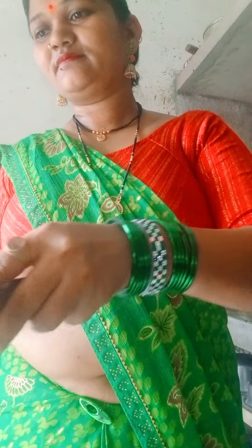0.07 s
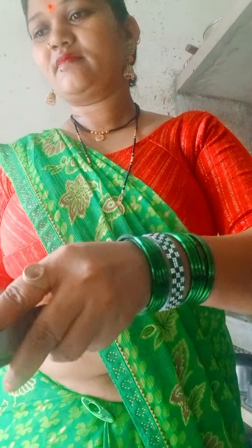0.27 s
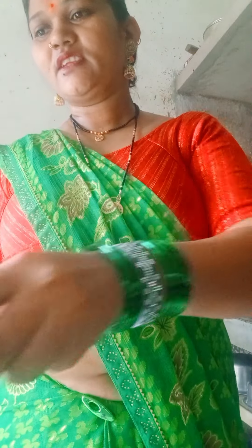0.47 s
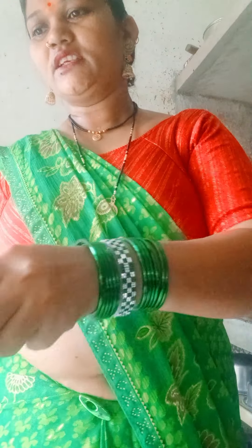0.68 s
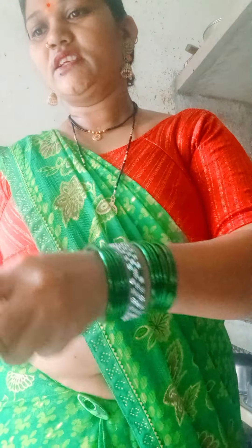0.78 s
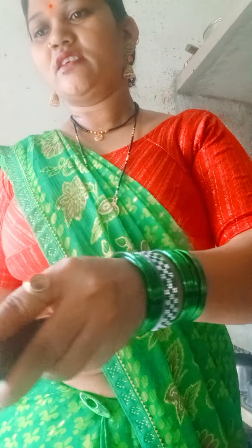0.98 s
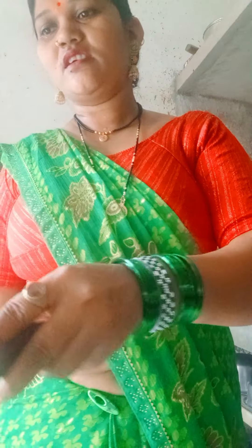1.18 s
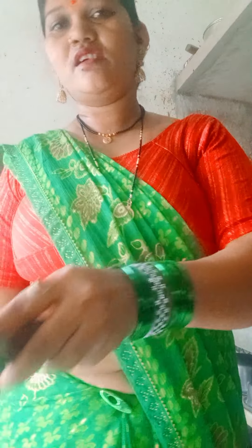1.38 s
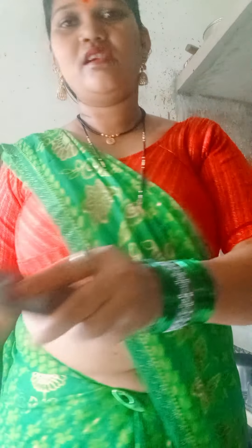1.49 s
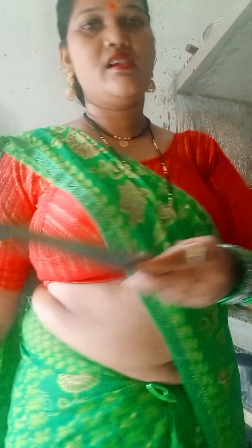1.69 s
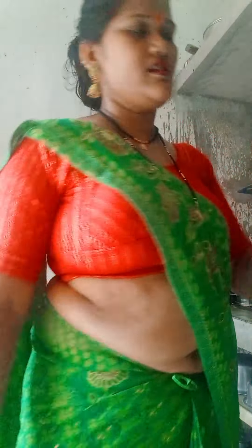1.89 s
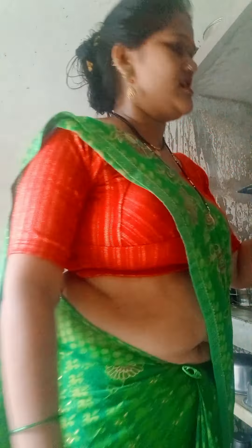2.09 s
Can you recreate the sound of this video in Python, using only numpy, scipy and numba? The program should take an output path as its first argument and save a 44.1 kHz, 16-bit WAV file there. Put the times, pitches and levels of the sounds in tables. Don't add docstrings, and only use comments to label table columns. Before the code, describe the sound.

Stacked glass bangles rattle and knock loudly on a shaken wrist close to a small microphone, stop at about one and a half seconds, then a few loose ones tinkle in a small hard kitchen.

```python
import sys
import numpy as np
from scipy import signal
from scipy.fft import rfft, irfft
from scipy.io import wavfile
from scipy.ndimage import uniform_filter1d, minimum_filter1d
from numba import njit

SR = 44100
rng = np.random.default_rng(int(sys.argv[2]) if len(sys.argv) > 2 else 0)


def persist_wave(psi):
    counts = np.round(np.clip(psi, -1, 1) * 32767).astype(np.int16)
    wavfile.write(sys.argv[1], SR, np.atleast_2d(counts).T)


def makeup_ratio(level_db):
    decades = np.asarray(level_db, float) / 20
    return 10 ** decades


N = 94770

# start_s [s], level_db [dB], bright [dB per octave], bass [dB per octave]
SHAKING = [(0, -21, 10, 6), (0.121, -18, -4.5, -3.5), (0.217, -22, -12, -18), (0.241, -19, 7.5, 5.5),
           (0.369, -16.5, 6.5, 0.5), (0.468, -21, 1, 4), (0.562, -36, -1, -10.5), (0.634, -15, 5, -8.5),
           (.71, -29, 7.5, -23), (0.854, -31.5, 0.5, -5), (0.892, -18, 5, -13), (0.997, -19.5, 4, -5.5),
           (1.081, -35.5, -12.5, -17.5), (1.14, -42.5, -9, -12), (1.161, -23, 8.5, 4),
           (1.29, -23, -1.5, -11), (1.4, -22, 3.5, 6.5), (1.53, -35, -25.5, -30)]
# start_s [s], peak_db [dB], bright [dB per octave], chatter_db [dB]
HARD_KNOCKS = [(0.034, 2, -6, -11), (0.054, -17, -4, -14.5), (0.082, -23, 13, -1), (0.101, 4.5, -10, -1.5),
               (0.141, 0.5, -8, -1), (0.2, -14, -6, -12), (0.229, -12, -10, -7.5), (0.271, -2, 5, -19),
               (0.306, -10, 14, -16.5), (0.358, 4.5, -12, 4), (0.397, 8, 5, -10.5), (0.455, 8.5, 2, -12),
               (0.494, 10.5, 3, -10.5), (0.558, -8, -10.5, -13), (0.588, 4, 4, 2.5),
               (0.645, 7.5, -12.5, -1), (0.729, -2.5, 7.5, 0.5), (0.78, 5.5, 2, -3), (0.872, 1, 7, 0),
               (0.912, -4, 12.5, -16), (0.963, -23, 1, 0), (1.025, -6, -26, 3), (1.152, -7.5, 2.5, 5),
               (1.183, 13.5, -5.5, -5), (1.214, 2.5, 6.5, -7), (1.236, 2, 5, -9), (1.301, 5, 2.5, -18.5),
               (1.32, 11, 3.5, -15.5), (1.387, 6, 5, -18), (1.492, -7.5, -10, 2.5)]
# start_s [s], peak_db [dB], pitch_hz [Hz]
SHARP_BLOWS = [(0.0134, -5.5, 1960), (0.0333, -5.5, 1750), (0.0538, -4.5, 2140), (0.0749, -9.5, 1720),
               (0.0827, -12, 1770), (0.0931, -16.5, 1940), (0.1019, -9.5, 1980), (0.1414, -7, 1670),
               (0.1646, -12.5, 1740), (0.171, -13, 2100), (0.2011, -10, 1840), (0.21, -17.5, 2100),
               (0.2284, -9, 1760), (0.2369, -10.5, 2020), (0.2718, -3, 1800), (0.3053, 4, 2200),
               (0.3119, -23, 2060), (0.3197, -12, 2340), (0.3371, -7, 1980), (0.3446, -9.5, 1860),
               (0.3659, -1.5, 1910), (0.3721, 4, 1554), (0.3969, -2, 2075), (0.4022, -5.5, 1880),
               (0.417, -5, 1860), (0.427, -2, 1585), (0.4383, -10.5, 1910), (0.4551, -15.5, 1620),
               (0.477, -8, 2090), (0.4936, -4.5, 1910), (0.5005, -6, 1338), (0.5584, -16.5, 2020),
               (0.583, -12, 2170), (0.5882, -11.5, 2190), (0.6389, -9, 1644), (0.6469, -4.5, 1920),
               (0.7296, -12.5, 2350), (0.7803, -2, 1780), (0.7968, -7, 2025), (0.8666, -21, 1990),
               (0.8717, -7, 2430), (0.913, -3.5, 2800), (0.9642, -10.5, 1900), (0.9772, -7.5, 2120),
               (0.988, -17.5, 1690), (1.0234, -13.5, 1900), (1.1783, -9, 2060), (1.1849, -1.5, 1950),
               (1.217, -5, 2200), (1.2353, -3.5, 1746), (1.2505, -10, 2060), (1.2786, -16.5, 1900),
               (1.2953, -14, 1590), (1.302, -8.5, 2110), (1.32, -4.5, 2160), (1.3432, -3.5, 1700),
               (1.3741, -8, 1960), (1.3901, -3.5, 2080), (1.3967, -6.5, 1780), (1.4915, -22, 1870)]
BODY_MODES_HZ = [703, 875, 871.4, 1205, 1239.5, 1474, 1675, 1853, 1995, 2215, 2513, 2696, 2990, 3534]
# pitch_hz [Hz], density_db [dB per Hz]
FIZZ_SPECTRUM = [(3000, -34), (4500, 0), (8500, -9.5), (12500, -31), (15500, -11.5)]
# pitch_hz [Hz], density_db [dB per Hz]
STACK_SPECTRUM = [(430, -41.5), (700, -15), (900, -2), (1900, 8), (2900, -7), (4500, -28), (8500, -47.5),
                  (16000, -59.5)]
# start_s [s], peak_db [dB]
LOOSE_TOUCHES = [
    (1.9463, -32.5),
    (1.9714, -25.5),
    (1.9967, -23.5),
    (2.0203, -17),
]
# pitch_hz [Hz], level_db [dB], t60_s [s]
FIRST_BANGLE = [(5660, 3.5, 0.035), (8400, -12, 0.018), (10300, 11, 0.033), (10700, 0, 0.028),
                (14700, -7, .04), (15600, 14, 0.041)]
SECOND_BANGLE = [(5400, -12, 5.0), (6640, -8, 0.034), (7140, -6, 5.0), (8500, -2, 0.03), (9060, -24, 5.0),
                 (9900, -8, 0.071), (10980, -8, 0.19), (15600, -4.5, 0.12), (15710, -29, 5.0)]
THIRD_BANGLE = [(3750, -13, 0.16), (4400, -25, 5.0), (5560, -5, 0.072), (6480, -4, 0.024), (8630, -9, 0.08),
                (10900, -17, 0.093), (10800, -13, 0.22), (15020, -17, 5.0), (16100, -24, 5.0)]
LAST_BANGLE = [(3720, -16, 0.24), (5580, -16.5, 0.21), (5500, -10.5, 0.17), (6090, -6, 0.049),
               (7250, -14, 0.13), (8500, -26, 0.097), (9970, -10.5, .25), (10320, 1, 0.44),
               (11300, -9, 0.18), (14800, -1, .14), (15700, -5, 0.12)]
# start_s [s], peak_db [dB]
FAINT_TOUCHES = [
    (1.5716, -62),
    (1.641, -46),
    (1.675, -45.5),
    (1.701, -55),
    (1.932, -51),
]
# pitch_hz [Hz], level_db [dB], t60_s [s]
FAINT_BANGLE = [(6750, -11, 0.016), (7050, -21, 0.055), (8430, 3, 0.027), (10800, -3, 0.033),
                (10370, 6, 0.031), (14600, -22, 0.027), (15900, 6, 0.036)]
# pitch_hz [Hz], density_db [dB per Hz]
CRACK_SPECTRUM = [(1760, -69), (3000, -41), (3620, -34), (4130, -12), (5250, -14.5), (10300, 3),
                  (12400, -5.5), (16000, 9), (17000, -53)]
# start_s [s], pitch_hz [Hz], level_db [dB], t60_s [s]
SINGING_RINGS = [
    (1.061, 4500, -62, .1),
    (1.071, 3134, -50, 0.12),
    (1.166, 1260, -26, 0.049),
    (1.52, 3493, -74, 0.66),
    (1.7, 3470, -62.5, 0.38),
    (1.819, 5750, -69.5, 0.18),
    (1.83, 4260, -68, 0.33),
    (1.891, 5660, -44, 0.11),
]
# centre_s [s], level_db [dB], length_s [s]
AIR_PUFFS = [
    (0.354, -72, 0.034),
    (1.3, -66, .06),
    (1.55, -61, 0.042),
]
# pitch_hz [Hz], density_db [dB per Hz]
HUSH_SPECTRUM = [(30, -33), (130, -9), (450, -12), (1500, 2.5), (2200, -5.5), (3500, -24), (7000, -38.5),
                 (16500, -49.5)]
# pitch_hz [Hz], gain_db [dB]
MIC_RESPONSE = [(9000, 5.5), (11000, -4.5), (12600, -6.5), (14200, -8.5), (15800, 5.5), (16100, -22)]

CONTACT_CYCLES = 0.88
PIVOT_HZ = 1800


def curve(table, hz):
    f, db = np.array(table, float).T
    return np.interp(np.log(np.maximum(hz, 1)), np.log(f), db)


def colour(x, table):
    y = irfft(rfft(x) * makeup_ratio(curve(table, np.fft.rfftfreq(len(x), 1 / SR))), len(x))
    return y / y.std()


def highpass(x, hz, order):
    return signal.sosfilt(signal.butter(order, hz, "highpass", fs=SR, output="sos"), x)


@njit
def rings(start, hz, t60, rise, size, count, sr):
    out = np.zeros(count)
    for k in range(len(hz)):
        turn = np.exp(2j * np.pi * hz[k] / sr - np.log(1000) / (t60[k] * sr))
        z = size[k] + 0j
        first = int(start[k] * sr)
        unrisen = 1.
        fall = np.exp(-1 / (rise[k] * sr))
        for i in range(max(first, 0), min(count, first + int(t60[k] * sr))):
            out[i] += z.imag * (1 - unrisen) ** 3
            z *= turn
            unrisen *= fall
    return out


def strike(s, hz, t60, size, rise=0.):
    s, hz, t60, size, rise = (np.ravel(1. * a) for a in np.broadcast_arrays(s, hz, t60, size, rise))
    rise = rise + CONTACT_CYCLES / hz
    return rings(s, np.clip(hz, 50, .45 * SR), np.clip(t60, .001, .6), rise, size, N, 1. * SR)


def contact(s, db, bright, bass):
    thud_cycles, ring_t60_s, ring_db = 7.0, .04, -9
    glint_t60_s, glint_db = 0.039, -6.5
    s, db, bright, bass = (a[:, None] for a in (s, db, bright, bass))
    u = rng.random((len(s), 48))

    def tilt(hz):
        slope = np.where(hz > PIVOT_HZ, bright, -bass)
        return curve(STACK_SPECTRUM, hz) + np.log2(hz / PIVOT_HZ) * slope

    hz = 420 * 2 ** (.44 * (np.arange(12) + u[:, :12]))
    late = .0006 * u[:, 24:36] * (1 + 5 * (hz > 3500))
    spread = np.maximum(hz / PIVOT_HZ, PIVOT_HZ / hz) ** 1.22
    thud_t60 = thud_cycles * (.5 + u[:, 12:24]) / PIVOT_HZ * spread
    thud_db = db + tilt(hz) - 9.9 * (hz > 5000) + 6.0 * np.log10(hz / PIVOT_HZ) - 1.7 * u[:, 36:]
    sign = np.sign(u[:, 36:] - .5)
    thud = strike(s + late, hz, thud_t60, sign * makeup_ratio(thud_db))

    pick = (len(BODY_MODES_HZ) * u[:, 20:23]).astype(int)
    body = np.array(BODY_MODES_HZ)[pick] * (.97 + 0.061 * u[:, 6:9])
    ring_t60 = ring_t60_s * (.5 + u[:, 3:6]) * np.maximum(1500 / body, 1)
    ring = strike(s, body, ring_t60, makeup_ratio(db + ring_db + tilt(body)))

    high = 3600 * 2 ** (0.23 * (np.arange(12) + u[:, 26:38]))
    size = makeup_ratio(db + glint_db + tilt(high) + 10 * u[:, :12] ** 14)
    glint = strike(s + .01 * u[:, 36:], high, glint_t60_s * (0.11 + u[:, 13:25]), size, 0.00017)
    return thud + ring + glint


def rattle():
    bounces_per_s, spread_db, bounce_db = 440, 3.5, -7
    t, db, bright, bass = np.array(SHAKING, float).T
    u = rng.random((730, 2))
    s = np.cumsum(-np.log(1 - u[:, 0])) / bounces_per_s - .002
    size = bounce_db - spread_db * np.log(1 - .93 * u[:, 1]) + np.interp(s, t, db)
    size = size - 200 * (s > t[-1])
    return contact(s, size, np.interp(s, t, bright), np.interp(s, t, bass))


def fizz():
    t, db, bright, _ = np.array(SHAKING, float).T
    now = np.arange(N) / SR
    level_db = -57.5 + np.interp(now, t, db + 2.0 * bright)
    return colour(rng.standard_normal(N), FIZZ_SPECTRUM) * makeup_ratio(level_db)


def hush():
    t = np.arange(N) / SR
    band = signal.butter(2, [30, 110], "bandpass", fs=SR, output="sos")
    low = signal.sosfilt(band, rng.standard_normal(N))
    air = sum(makeup_ratio(db) * np.exp(-((t - s) / d) ** 2) for s, db, d in AIR_PUFFS)
    room = makeup_ratio(-54.5) * colour(rng.standard_normal(N), HUSH_SPECTRUM)
    return room + air * low / low.std()


def taps():
    snap_db, snap_cycles, snap_top_hz = 12.5, 7.5, 4500
    s, db, mid = (a[:, None] for a in np.array(SHARP_BLOWS, float).T)
    hz = mid * np.array([.74, 1.0, 1.4]) * (0.92 + 0.17 * rng.random((len(s), 3)))
    size = makeup_ratio(db + snap_db + np.array([-4, 0, -4]))
    rise = CONTACT_CYCLES * (1 / mid - 1 / hz)
    blows = strike(s - .0005, hz, snap_cycles / mid, size, rise)
    return signal.sosfilt(signal.butter(2, snap_top_hz, fs=SR, output="sos"), blows)


def knocks():
    knock_db, chatter_s = -16, 0.0079
    t, db, bright, chatter_db = np.array(HARD_KNOCKS, float).T
    u = rng.random((len(t), 7))
    late = (np.cumsum(u, axis=1) - .9) * chatter_s * .5
    s = np.c_[t, t[:, None] + late].ravel()
    neighbours_db = (db + chatter_db)[:, None] - 8.7 * np.abs(late) / chatter_s - 6 * u[:, ::-1]
    size = np.c_[db - 5, neighbours_db] + knock_db
    shake = np.array(SHAKING, float)
    return contact(s, size.ravel(), np.repeat(bright, 8), np.interp(s, shake[:, 0], shake[:, 3]))


def singing():
    s, hz, db, t60 = np.array(SINGING_RINGS, float).T
    out = 0
    for k, u in enumerate(rng.random((5, len(s)))):
        detuned = hz * (1 + 0.0141 * (u - .5))
        out = out + strike(s - .03 + 0.0099 * k, detuned, t60, makeup_ratio(db - 2 + 0.86 * k), 0.009)
    return out


def chimes():
    chime_db, crack_db, crack_low_hz, twin_hz = -16.5, -13, 4530, 340
    out, t = 0, np.arange(N) / SR
    hiss = colour(rng.standard_normal(N), CRACK_SPECTRUM)
    bangles = [FIRST_BANGLE, SECOND_BANGLE, THIRD_BANGLE, LAST_BANGLE]
    bangles = bangles + len(FAINT_TOUCHES) * [FAINT_BANGLE]
    for (s, db), bangle in zip(LOOSE_TOUCHES + FAINT_TOUCHES, bangles):
        hz, mode_db, t60 = np.array(bangle, float).T
        u = rng.random((3, 6, len(hz)))
        split = hz * (1 + twin_hz / 3700.0 * (u[1] - .5))
        decay = np.minimum(t60, .2) * (0.7 + 0.88 * u[2])
        size = makeup_ratio(db + chime_db + mode_db - 12.4 * u[2])
        out = out + strike(s + 0.016 * u[0] ** 3, split, decay, size, 0.0001)
        late = np.maximum(t - s, 0)
        fade = 1.4 * np.exp(-late / 0.00051) + np.exp(-late / 0.0027) + 0.29 * np.exp(-late / 0.012)
        crack = hiss * (1 - np.exp(-late / .0002)) * makeup_ratio(db + crack_db) * fade
        out = out + highpass(crack, crack_low_hz, 4)
    return out


def room(near):
    t60_s, top_hz, level_db = .21, 5400, -13
    t = np.arange(SR // 2) / SR
    tail = rng.standard_normal(len(t)) * makeup_ratio(-60 * t / t60_s) * (t > .004)
    tail = signal.lfilter(*signal.butter(1, top_hz, fs=SR), tail)
    return makeup_ratio(level_db) * signal.fftconvolve(near, tail / np.sqrt(np.sum(tail ** 2)))[:N]


def scene():
    dip_hz, dip_width_hz, dip_share = 1012, 71, 0.51
    tight_low_hz, loose_low_hz = 734, 394
    stack = rattle() + fizz() + taps() + knocks()
    peak = signal.iirpeak(dip_hz, dip_hz / dip_width_hz, fs=SR)
    stack = stack - dip_share * signal.lfilter(*peak, stack)
    tight = highpass(stack, tight_low_hz, 8)
    loose = highpass(stack, loose_low_hz, 8)
    shake = np.array(SHAKING, float)
    bass = np.interp(np.arange(N) / SR, shake[:, 0], shake[:, 3])
    slack = np.clip(bass / 7.03, 0, 1)
    near = tight + slack * (loose - tight) + singing() + chimes()
    return (near + room(near) + hush())[None]


def top_cut(x):
    return signal.sosfilt(signal.butter(12, 17240, fs=SR, output="sos"), x)


def record(dry):
    limit, top_hz = .88, 17300
    x = irfft(rfft(dry) * makeup_ratio(curve(MIC_RESPONSE, np.fft.rfftfreq(N, 1 / SR))), N)
    hold = minimum_filter1d(limit / np.maximum(np.abs(x), limit), size=301)
    x = x * uniform_filter1d(uniform_filter1d(hold, size=150), size=150)
    mix = signal.sosfilt(signal.ellip(8, .2, 60, top_hz, fs=SR, output="sos"), x)
    return top_cut(mix)


dry = scene()
out = record(dry)
persist_wave(out)
```